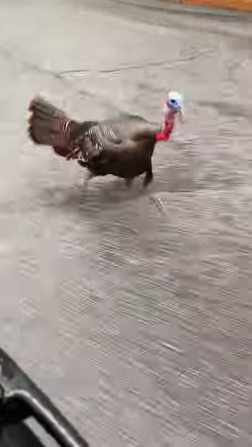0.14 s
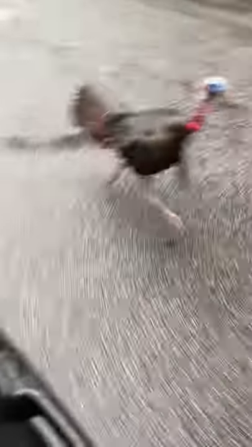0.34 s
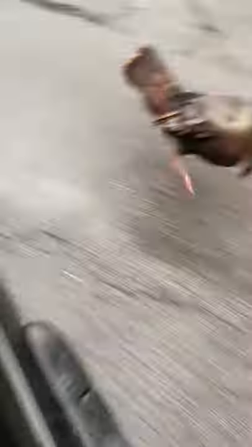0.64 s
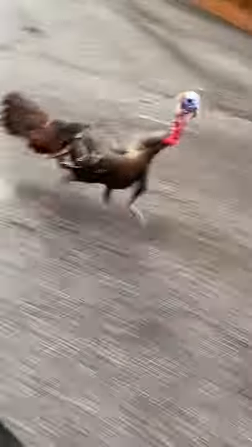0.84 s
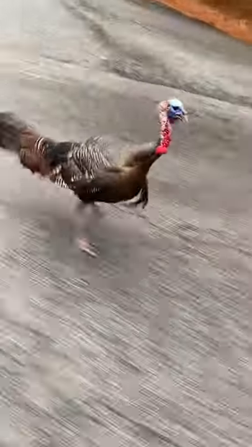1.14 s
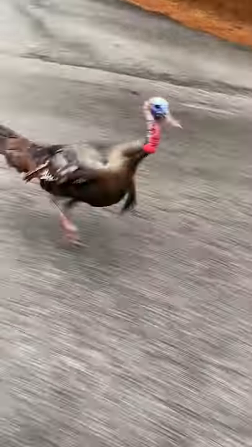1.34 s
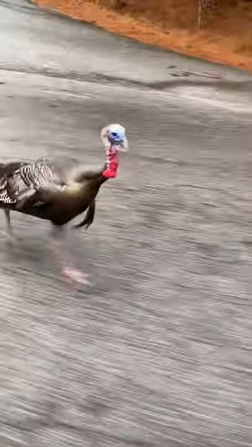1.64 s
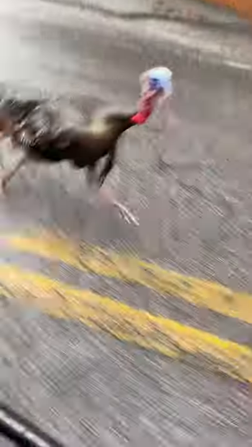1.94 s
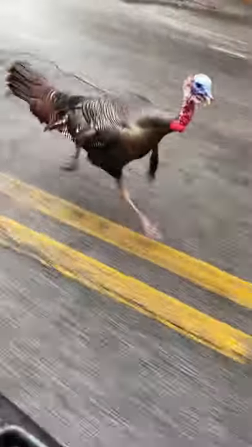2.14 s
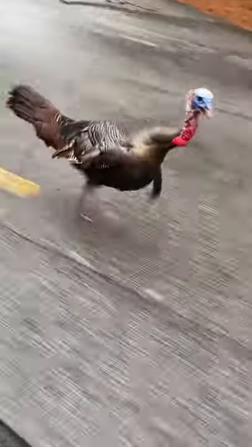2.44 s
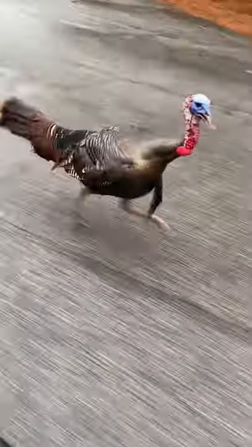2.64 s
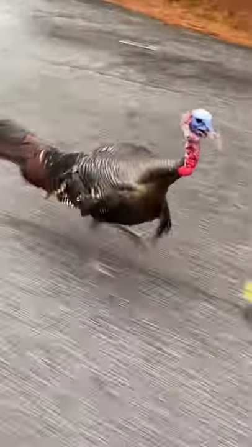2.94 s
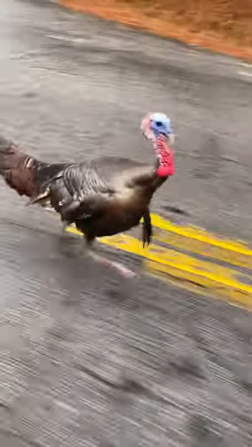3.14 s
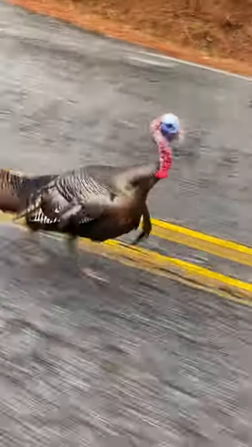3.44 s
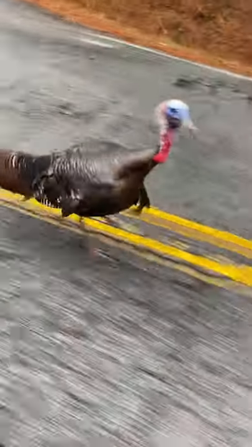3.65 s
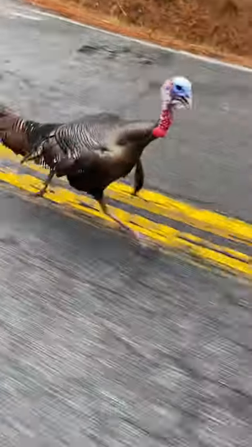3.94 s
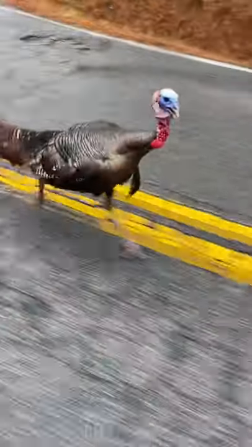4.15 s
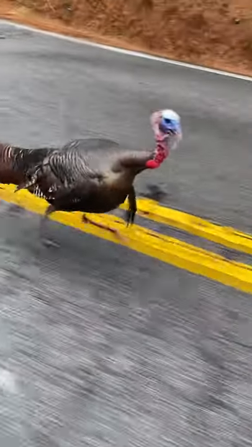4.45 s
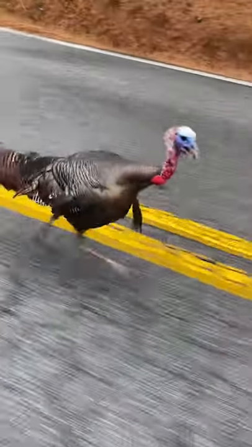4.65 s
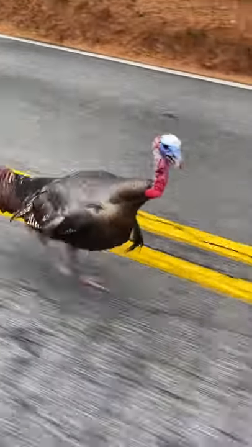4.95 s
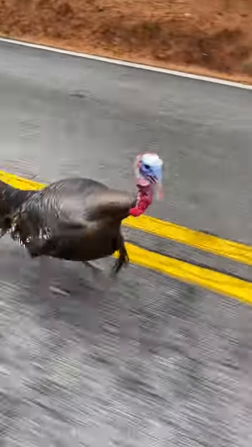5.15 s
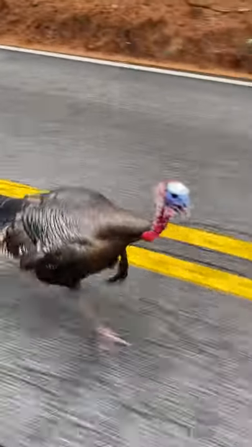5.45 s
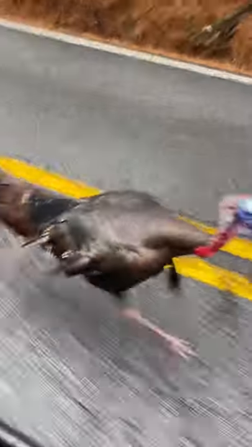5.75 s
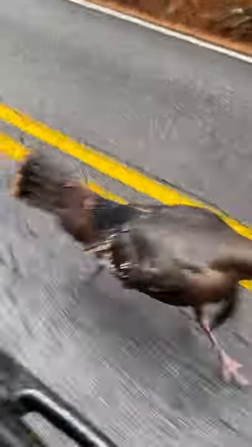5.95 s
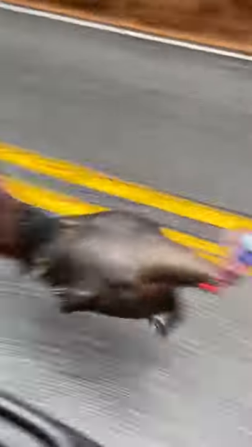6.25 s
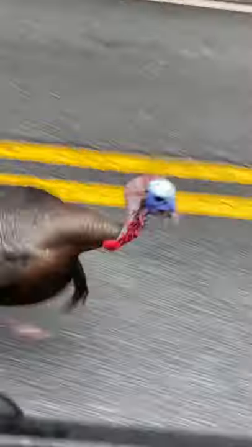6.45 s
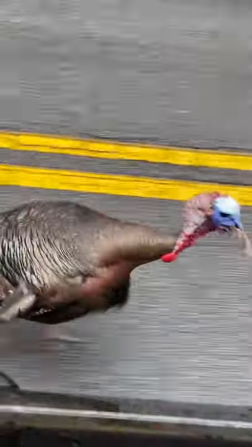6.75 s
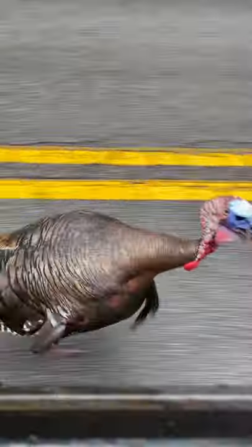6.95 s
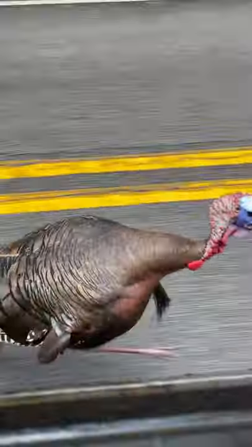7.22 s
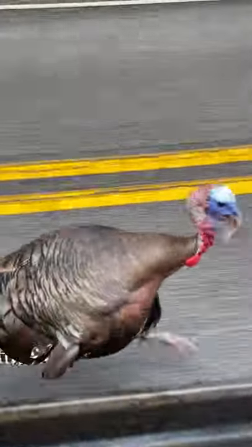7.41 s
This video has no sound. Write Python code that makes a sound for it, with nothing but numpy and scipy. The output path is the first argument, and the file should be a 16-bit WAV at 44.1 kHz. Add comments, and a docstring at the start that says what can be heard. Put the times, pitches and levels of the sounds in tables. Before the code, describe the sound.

Wind thumps and quick wet claw taps open, then a turkey's short reedy gobbles burst out close by, growing louder over steady car rumble.

```python
"""Wind pops, car rumble and quick wet footfalls come first; then a wild turkey whines, yelps and gobbles.
It runs close to the open window of a slowly rolling car; each gobble is a fast swoop of one reedy tone.
Pressed notes break an octave down through half-order partials; road and cabin throw the voice back.
Feet and drops are ticks of noise, the car is coloured noise, and each wind pop is a swing and a puff."""
import sys
import numpy as np
from scipy import signal
from scipy.fft import rfft, irfft, next_fast_len
from scipy.io import wavfile
from scipy.ndimage import map_coordinates

SR = 44100
rng = np.random.default_rng(int(sys.argv[2]) if len(sys.argv) > 2 else 0)


def master_out(mix):
    """Clip the mix to full scale and print it as 16-bit PCM to the path in sys.argv[1]."""
    frames = np.transpose(np.atleast_2d(mix))
    ceiling = np.clip(frames, -1, 1)
    pcm = np.round(ceiling * 32767).astype(np.int16)
    wavfile.write(sys.argv[1], SR, pcm)


N = 334278
TOP_HZ = 16500  # upper limit of the recorded band

# How road and wind rise and fall on the drive.
# Each row: time in seconds, relative level of the rumble in dB, relative level of the wind in dB.
DRIVE_LEVELS = [(0.0, -32, -39.5), (0.69, -32.5, -33), (1.12, -31, -34), (1.39, -32, -35), (1.58, -32, -38),
                (1.98, -34, -35), (2.2, -42, -45.5), (2.47, -44.5, -46.5), (3.04, -42.5, -44),
                (3.27, -31, -38), (3.46, -41, -45.5), (3.78, -45.5, -47.5), (4.22, -38.5, -44),
                (4.54, -40.5, -43), (5.07, -40.5, -43), (5.34, -42, -44), (6.71, -37, -44),
                (7.58, -39.5, -43)]
# Colour of a foot or a drop striking wet asphalt. Each row: frequency in Hz, gain in dB.
WET_STRIKE = [(600, -1.5), (1800, -3.5), (3000, -3), (5000, -4), (7500, 4.5), (10000, -3), (13500, -5),
              (16000, -14)]


def amp(db):
    """Decibels to gain."""
    return 10 ** (np.asarray(db) / 20)


def unit(x):
    """Scale to rms 1."""
    return x / np.sqrt(np.mean(x ** 2) + 1e-20)


def along(points, hz):
    """Read (Hz, value) points on a log frequency axis."""
    f, v = np.transpose(points)
    return np.interp(np.log(hz + 1), np.log(f), v)


def wobble(rate, size=N):
    """A smooth random curve with this many knots a second."""
    knot_count = int(size * rate / SR) + 4
    knots = np.random.default_rng(rng.integers(2 ** 32)).standard_normal(knot_count)
    return map_coordinates(knots, [np.arange(size) * rate / SR])


def filtered(x, response):
    """Multiply the spectrum of x by a response of frequency."""
    m = next_fast_len(x.shape[-1] + 4096)
    spectrum = rfft(x, m) * response(np.fft.rfftfreq(m, 1 / SR))
    return irfft(spectrum, m)[..., :x.shape[-1]]


def noise(spectrum):
    """Coloured noise of rms 1."""
    return unit(filtered(rng.standard_normal(N), lambda hz: amp(along(spectrum, hz))))


def add(track, s, sound):
    """Mix a sound in at time s, cut at the ends of the track."""
    start = round(s * SR)
    part = sound[max(-start, 0):max(N - start, 0)]
    track[max(start, 0):][:len(part)] += part


def placed(x, balance_db):
    """Two close microphone ports; the camera body shifts their phase and shades their midrange."""
    # Sound bending round the body. Each row: frequency in Hz, lead of the left port in radians.
    port_phase = [(60, -.03), (300, -.15), (700, -.55), (1500, -.15), (3000, .3), (5200, .35), (6300, 2.2),
                  (7000, 3.05), (7700, 3.25), (10500, 6.3), (11500, 7.15), (12500, 8.7), (14000, 9.6),
                  (16500, 12.3)]
    shading = [(250, 0.082), (600, 0.69), (1400, 0.4), (2800, 0.12)]  # (Hz, share of the balance)

    def port(side):
        def response(hz):
            level_db = side * balance_db * along(shading, hz) / 2
            return amp(level_db) * np.exp(.5j * side * along(port_phase, hz))
        return filtered(x, response)

    return np.array([port(side) for side in (1, -1)])  # left, right


def car(rumble_db=5.0, flutter_db=-1, wide_hiss_db=-7, wide_flutter_db=-7, wide_rumble_db=-21, bumps_db=2):
    """Road rumble, air fluttering round the window and wet tyre hiss; part of each differs between ports."""
    # Colours of road, window air and wet tyres. Each row: frequency in Hz, gain in dB.
    rumble_colour = [(15, -12), (28, -27), (45, 1), (78, -1), (110, -4), (170, -12), (300, -25.5),
                     (700, -133)]
    flutter_colour = [(60, -36), (130, -5), (230, -1.5), (400, -8.5), (700, -15), (1200, -37), (2500, -76),
                      (6000, -89)]
    tyre_colour = [(200, 4), (600, 22.5), (1100, 20), (2000, 13), (3200, 7), (4300, 1.5), (5800, 2.5),
                   (6400, 0), (7500, -1), (9300, -3.5), (11500, -7), (13500, -9), (15500, -12.5)]
    # Tyre hiss over the drive. Each row: time in seconds, level in dB.
    hiss_levels = [(0, -40.5), (1.2, -44.5), (2.6, -46), (7.5, -46.5)]
    t = np.arange(N) / SR
    s, *columns = np.transpose(DRIVE_LEVELS)
    road, wind = [amp(np.interp(t, s, c)) for c in columns]
    road = road * amp(bumps_db * wobble(9))
    hiss = amp(np.interp(t, *np.transpose(hiss_levels)) + 0.053 * wobble(11.0))
    flutter = amp(flutter_db) * wind * unit(noise(flutter_colour) * amp(4.3 * wobble(45)))
    shared = amp(rumble_db) * road * noise(rumble_colour) + flutter + hiss * noise(tyre_colour)

    def pair(spectrum):
        return np.array([noise(spectrum), noise(spectrum)])

    wide = amp(wide_hiss_db) * hiss * pair(tyre_colour)
    wide += amp(wide_flutter_db) * wind * pair(flutter_colour)
    wide += amp(wide_rumble_db) * road * pair(rumble_colour)
    return placed(shared, balance_db=-1.5) + wide


def buffets(steepness=3.1, rise=0.91, puff_db=-3, push_db=3.5, count=60):
    """An eddy hits the microphone as a pressure swing with a low puff; lesser ones come by chance."""
    # The strongest pops. Each row: time in seconds, relative level in dB, length in seconds, corner in Hz.
    strong_pops = [(.04, -13.5, 0.017, 706), (.168, -25, 0.022, 546), (.211, -22, 0.024, 504),
                   (.308, -12.5, 0.0065, 684), (.373, -20, 0.014, 477), (.475, -23.5, 0.014, 590),
                   (.517, -25.5, 0.013, 510), (.728, -17, 0.0042, 820), (.803, -23.5, 0.016, 560),
                   (.922, -18.5, 0.018, 750), (.963, -15, 0.0082, 510), (1.141, -15, 0.0019, 654),
                   (1.159, -19, 0.0053, 610), (1.176, -16.5, 0.0032, 630), (1.216, -14, 0.018, 91),
                   (1.263, -14, 0.0019, 875), (1.31, -18.5, 0.027, 560), (1.375, -21.5, 0.023, 378),
                   (1.468, -15.5, 0.013, 550), (1.555, -16, 0.013, 676), (1.614, -20, 0.0098, 490),
                   (1.815, -20, 0.01, 313), (1.952, -8.5, 0.016, 380), (1.973, -12.5, 0.011, 430),
                   (2.096, -25, 0.018, 342), (3.138, -5, 0.018, 90), (3.1426, -12.5, 0.005, 400),
                   (3.168, -17, 0.024, 298), (3.305, -17, 0.01, 268), (4.413, -18.5, 0.028, 144),
                   (6.955, -26.5, 0.028, 197)]
    # Lesser eddies: relative level in the strongest wind, dB gained per dB of wind, typical length and corner
    eddy_db, eddy_grows, eddy_s, eddy_hz = -20.5, 1.22, 0.011, 484
    out = np.zeros(N)
    t = np.arange(-SR // 12, SR // 12) / SR
    times, _, wind_db = np.transpose(DRIVE_LEVELS)
    eddies = []
    for k, (when, long, high) in enumerate(rng.random((count, 3))):
        s = (k + when) / count * N / SR
        db = eddy_db + eddy_grows * (np.interp(s, times, wind_db) - wind_db.max())
        eddies.append((s, db, eddy_s * (.5 + long), eddy_hz * (.5 + high)))
    for s, db, length, corner_hz in list(strong_pops) + eddies:
        shape = np.exp(-(t / (length * np.where(t < 0, rise, 1))) ** 2)

        def colour(hz):
            return hz ** 2 / (hz ** 2 + 65 ** 2) / (1 + (hz / corner_hz) ** steepness)

        puff = unit(filtered(shape * rng.standard_normal(len(t)), colour))
        puff = puff * np.sqrt(np.mean(shape ** 2))
        u = 2 * np.pi * corner_hz * t
        push = -np.tanh(3 * u) * np.exp(-np.abs(u) / 2.2)
        add(out, s + t[0], amp(db) * (amp(puff_db) * puff + amp(push_db) * push))
    # eddies carry little treble, and the microphone drops their deepest bass
    return filtered(out, lambda hz: hz ** 4 / (hz ** 4 + 30 ** 4) / (1 + (hz / 1700) ** 6))


def spray(count=14, drop_db=-43, spread_db=4, t60=0.037):
    """Drops thrown up from the road tick as decaying noise; the small ones come by chance."""
    # The larger drops. Each row: time in seconds, peak in dB before the wet colour.
    large_drops = [(0.31, -36.5), (0.501, -32.5), (0.578, -35), (0.6602, -33), (0.848, -33.5), (1.915, -35),
                   (2.416, -36), (2.55, -33), (3.1293, -35), (3.1712, -35), (3.3833, -36), (5.372, -30),
                   (6.3158, -33.5), (6.6997, -32)]
    out = np.zeros(N)
    t = np.arange(SR // 50) / SR
    small_drops = [(when * N / SR, drop_db + spread_db * (2 * size - 1))
                   for when, size in rng.random((count, 2))]
    for s, db in list(large_drops) + small_drops:
        add(out, s, amp(db - 60 * t / t60) * rng.standard_normal(len(t)))
    return filtered(out, lambda hz: amp(along(WET_STRIKE, hz)))


def feet(spread=0.019, tick_t60=0.013, splash_s=0.0079, tick_db=2, wet_db=-19, fade_db=200):
    """Toes and claws land one after another as ticks of noise and flick up water."""
    # Footfalls, five or six a second.
    # Each row: time in seconds, relative level in dB, level of the later toes against the first in dB.
    steps = [(0.0321, -33, -1), (0.2178, -28.5, -9), (0.405, -29.5, -1), (0.56, -45, 1), (0.751, -29.5, 1),
             (0.9316, -26.5, -28), (1.101, -28.5, -1), (1.2753, -30, -5), (1.4669, -25, -6),
             (1.628, -30.5, -6), (1.812, -29.5, -2.5), (1.9726, -30, -0.5), (2.175, -33.5, 4),
             (2.3536, -30, -2), (2.5104, -35.5, 0), (2.7276, -27, -13), (2.916, -27.5, -6),
             (3.072, -31.5, -5), (3.288, -26, -1), (3.422, -24, -3), (3.625, -31.5, 1), (3.7963, -29.5, -6),
             (4.015, -34.5, -5), (4.191, -30.5, -13), (4.3806, -31, -2), (4.568, -39, 2),
             (4.7698, -24.5, -14), (4.935, -22.5, -31), (5.11, -24.5, -10), (5.2775, -23.5, -10),
             (5.4728, -28, -9), (5.6422, -24, -10.5), (5.8398, -18, -15), (6.0058, -24, -29),
             (6.2088, -24.5, -1), (6.3789, -30, 4.5), (6.5676, -18.5, -23), (6.7291, -25, -0.5),
             (6.9161, -25.5, -1.5), (7.0907, -23, -7), (7.2799, -28.5, 0), (7.4572, -24, -2.5)]
    out = np.zeros(N)
    t = np.arange(-SR // 50, SR // 15) / SR
    order = np.arange(4)[:, None]
    later = order > 0
    for s, db, later_db in steps:
        scatter = rng.uniform(0, 0.806, order.shape) * later
        toes = 0.00056 + spread * (order + scatter) / len(order)  # landing times, s
        age = t - toes
        toe_db = later * (later_db + rng.normal(0, 3, order.shape)) - fade_db * toes  # fade in dB a second
        onset = np.clip(age / .0003, 0, 1)
        ticks = (onset * amp(toe_db - 60 * np.abs(age) / tick_t60)).sum(0)
        splash = np.exp(-((t - .011) / splash_s) ** 2)
        envelope = amp(db) * (amp(tick_db) * ticks + amp(wet_db) * splash)
        add(out, s + t[0], envelope * rng.standard_normal(len(t)))
    return filtered(out, lambda hz: amp(along(WET_STRIKE, hz)))


def throat(hz):
    """Gain of the throat and beak, with added peaks near 3.2 and 3.8 kHz."""
    # Throat and open beak. Each row: frequency in Hz, gain in dB.
    tract = [(350, -73), (540, -9.5), (720, 4.5), (950, 3.5), (1300, 6), (1800, 5.5), (2100, -2),
             (2500, -12.5), (2900, -22), (4400, -16.5), (5400, -3.5), (6800, -19), (11000, -13),
             (16000, -27)]
    # Broad peaks in the voice's colour. Each row: centre in Hz, width in Hz, added gain in dB.
    colour_peaks = [(1650, 120, 0), (3200, 420, 6), (3760, 540, 10)]
    peaks_db = sum(db / (1 + ((hz - centre) / (width / 2)) ** 2) for centre, width, db in colour_peaks)
    return amp(along(tract, hz) + peaks_db)


def syrinx(pitch, level_db, split, bright_db, jitter, shimmer, rasp_db, slope_db=-14, press_db=6,
           effort=0.43, flicker_db=4, undertone_db=-5, air_hz=3200):
    """One reedy tone; as it splits, half-order partials rise between its harmonics and it turns rough."""
    size = len(pitch)
    split = np.clip(split, 0, 1)
    rough = .2 + split
    hz = pitch * (1 + jitter * rough * wobble(459.0, size))
    phase = 2 * np.pi * np.cumsum(hz) / SR
    orders = np.arange(1, 25)[:, None] / 2
    # the slope is in dB an octave, and pressing flattens it
    gains = amp((slope_db + press_db * split) * np.log2(np.maximum(orders, 1)))
    gains = gains * np.where(orders % 1, 1.18 * split, 1)
    gains = gains * amp(undertone_db * (orders < 1)) * (orders * hz < TOP_HZ)
    # a harder push closes the membranes more sharply
    brightness = amp(bright_db + effort * (level_db + 26))
    gains = gains * np.where(orders * hz > 2500, brightness, 1)
    gains = gains * amp(flicker_db * np.array([wobble(119.3, size) for _ in orders]))
    partials = gains * np.sin(orders * phase + rng.uniform(0, 2 * np.pi, orders.shape))
    # even out the loudness that the throat would give the tone
    rms_after_throat = np.sqrt(((gains * throat(orders * hz)) ** 2).sum(0) / 2)
    tone = partials.sum(0) / rms_after_throat
    # air escapes once a cycle
    puffs = rng.standard_normal(size) * (1 + np.cos(phase))
    air = filtered(puffs, lambda f: 1 / (1 + (f / air_hz) ** 2))
    voice = tone * (1 + shimmer * rough * wobble(669.5, size) / 2) + amp(rasp_db) * rough * air
    ends = signal.windows.tukey(size, min(1, 0.0042 * SR / size))
    return filtered(voice * amp(level_db) * ends, throat)


def barks(waver=0.023, attack_s=0.0052, release_s=0.0084, edge_db=14.5, arch_db=1, swell_db=5.5):
    """A pressed note opens fast, curves in pitch, and breaks an octave down while it is loud."""
    # Yelps and hoarse barks. Each row: start in seconds, length in seconds, relative level in dB,
    # first, middle and last pitch in Hz, octave split 0-1, brightness in dB, hoarseness 0-1.
    calls = [(.848, 0.023, -35.5, 1290, 1100, 990, 0.22, -7, 0.49),
             (1.653, 0.054, -42, 1256, 1380, 1550, .6, -3, 0),
             (1.936, 0.071, -27.5, 1005, 958, 910, 0.34, 15, 0.35),
             (2.004, 0.08, -37.5, 1505, 1596, 1730, 1, 0, 0.43),
             (2.037, 0.024, -25, 1660, 1595, 1570, 1, -6, 0.25),
             (2.051, 0.037, -19.5, 1316, 1254, 1130, 0.51, -3.5, 0.39),
             (2.082, 0.017, -26, 1640, 1560, 1420, .02, 2, .1),
             (2.184, 0.039, -16.5, 1230, 1500, 1674, 0.58, 2.5, 0.64),
             (2.373, 0.068, -32.5, 1324, 1513, 1590, 0.51, -15, 0.42),
             (2.401, 0.027, -21, 1317, 1233, 1130, 0.71, -11, 0.74),
             (2.442, 0.019, -37.5, 1530, 1510, 1470, .1, 0, .1),
             (2.899, 0.049, -28.5, 1194, 1444, 1350, 1, 0, 0.016),
             (3.604, 0.041, -22.5, 1032, 837, 930, 0.051, 24, 0.35),
             (3.656, 0.031, -24, 800, 984, 1030, 0.12, 22, 0.5),
             (4.478, 0.028, -26, 1586, 1114, 754, 0.49, 0, 0.51),
             (4.498, 0.032, -16, 1187, 1140, 1280, 1, -5, 0.41),
             (4.52, 0.041, -15.5, 1290, 1338, 1130, 0.56, -5, 0.9),
             (4.552, 0.033, -25.5, 1150, 1120, 1010, .04, -3, 0.37),
             (5.195, 0.029, -23.5, 1475, 1140, 745, 0.25, 3, 0.54),
             (5.215, 0.027, -13, 1348, 1378, 1370, 0.74, -4.5, 0.8),
             (5.238, 0.027, -18, 1254, 1110, 895, 0.21, -11, 0.31),
             (5.253, 0.034, -15.5, 953, 937, 1050, 0.64, 6, 0.44),
             (5.28, 0.031, -20.5, 1130, 956, 930, 0.38, 10, 0.43),
             (5.936, 0.022, -26, 1210, 1080, 870, 0.6, 0, 0.13),
             (5.949, 0.026, -15, 1254, 1254, 1580, 0.71, -1.5, 0.69),
             (6.226, 0.017, -30, 1350, 1470, 1530, 0.46, 7, 0),
             (6.241, 0.042, -29, 956, 965, 780, .06, -9, 0.16),
             (6.275, 0.049, -16, 1390, 1324, 1140, 0.64, -10.5, 0.098),
             (6.308, 0.028, -18.5, 1158, 1508, 1530, 0.79, -7, 0.39),
             (6.446, 0.03, -13, 1133, 1190, 1270, 1, -5, 0.19),
             (6.535, .043, -30.5, 1240, 1013, 1000, .1, 4, 0.4),
             (6.574, 0.027, -31.5, 1430, 1474, 1370, 0.79, -9, 0.26),
             (6.614, 0.034, -23.5, 1110, 930, 920, 0.71, 2, 0.019),
             (6.638, 0.063, -25, 1293, 1367, 1730, 0.9, -10, 0.22),
             (6.678, 0.021, -22, 1366, 1238, 1340, 0.98, -10, 1)]
    # What hoarseness does. Each row: hoarseness 0-1, relative pitch jitter, relative shimmer,
    # flicker of the partials in dB, relative rasp in dB.
    hoarse_voice = [(0, .008, .2, 1.5, -22), (.3, .04, .7, 3.5, -10), (1, .09, .8, 4, -2)]
    hoarseness, *roughness = np.transpose(hoarse_voice)
    out = np.zeros(N)
    for s, length, db, first_hz, middle_hz, last_hz, split, bright_db, hoarse in calls:
        t = np.arange(int(length * SR)) / SR
        push = np.clip(np.minimum(t / attack_s, (length - t) / release_s), 0, 1)
        arch = 1 - (2 * t / length - 1) ** 2
        tremor = wobble(91.4, len(t))
        bend_hz = middle_hz - (first_hz + last_hz) / 2
        pitch = (np.linspace(first_hz, last_hz, len(t)) + arch * bend_hz) * (1 + waver * tremor)
        # a note that does not split swells more in its middle
        middle_db = arch_db + swell_db * (1 - split) ** 2
        level_db = db - edge_db * (1 - push) + middle_db * (arch - .5)
        jitter, shimmer, flicker_db, rasp_db = [np.interp(hoarse, hoarseness, c) for c in roughness]
        add(out, s, syrinx(pitch, level_db, split * (1 + push) / 2, bright_db, jitter, shimmer, rasp_db,
                           flicker_db=flicker_db))
    return out


def whines(split=0.042, waver=0.024):
    """A nearly pure tone swells, quavers and sags in pitch."""
    # Clear whines. Each row: start in seconds, length in seconds, pitch in Hz, relative level in dB,
    # brightness in dB.
    calls = [(0.939, 0.013, 1110, -22.5, -2), (1.609, 0.033, 1210, -29.5, -5), (1.731, 0.11, 1077, -25, -9),
             (1.871, 0.071, 1057, -24.5, -3), (2.287, 0.069, 1047, -23, 5), (6.045, 0.044, 1018, -34.5, 4),
             (6.091, 0.051, 1080, -23.5, -3), (6.128, 0.11, 981, -20, 11), (6.963, 0.042, 1017, -21.5, 9)]
    quaver_hz, quaver_db, quaver_bend = 42.3, 3.5, 0.049  # the throat pulses in level and pitch
    sag, arch_db = 0.086, 9.5  # share of pitch lost over a whine; how much its middle swells
    out = np.zeros(N)
    for s, length, hz, db, bright_db in calls:
        t = np.arange(int(length * SR)) / SR
        from_middle = t / length - .5
        quaver = -np.cos(2 * np.pi * quaver_hz * t)
        pitch = hz * (1 - sag * from_middle + quaver_bend * quaver + waver * wobble(88.5, len(t)))
        level_db = db - arch_db * (2 * from_middle) ** 2 + quaver_db * (quaver - 1)
        add(out, s, syrinx(pitch, level_db, split, bright_db, jitter=.04, shimmer=1.1, rasp_db=-11,
                           slope_db=-17))
    return out


def gobbles(waver=0.027, burst_db=-6.5):
    """Each note sinks in pitch as it leads in, bursts, jumps up a register and fades over its crest."""
    # Gobble notes. Each row: time of the burst in seconds, relative level in dB, dip pitch in Hz,
    # crest pitch in Hz, lead-in level in dB, tail level in dB, octave split 0-1, brightness in dB.
    notes = [(.996, -21, 1046, 1110, -41, -45, 0, -8), (1.03, -23, 1042, 1290, -32, -38, 0.6, -2.5),
             (1.072, -13, 1002, 1510, -42, -31, 0.43, -1), (1.108, -20, 1133, 1440, -53, -27, 0.2, 5),
             (1.149, -20, 1283, 1505, -52, -26.5, 0.5, -2), (1.185, -40, 1235, 1500, -50.5, -39, 0.3, -3),
             (2.981, -12.5, 917, 1026, -35, -31, 0.8, -5), (3.019, -20, 1286, 1264, -48, -28.5, 0.8, -6),
             (3.057, -9.5, 1166, 1480, -23.5, -25, 0.87, -2.5),
             (3.095, -24.5, 1360, 1460, -52, -42, 0.8, 0), (3.171, -33, 1184, 1640, -48, -33.5, 0.5, -3),
             (3.211, -14.5, 1173, 1320, -51, -29, 1, -2), (3.708, -10.5, 984, 1576, -23, -19.5, 0.24, 6),
             (3.745, -13, 1010, 1960, -31, -16, 0.34, 0), (3.786, -6, 968, 1745, -17.5, -23.5, 0.7, 9),
             (3.825, -11.5, 975, 1500, -31, -24.5, 0.54, 7),
             (3.863, -12, 1020, 1840, -41.5, -26.5, 0.4, 13), (3.902, -12.5, 1080, 1660, -42, -32, 0.32, 8),
             (3.939, -6.5, 898, 1570, -22, -22.5, 0.7, 6.5), (4.589, -12.5, 1135, 1206, -17, -24, 1, -3),
             (4.632, -10, 1073, 1670, -34, -20.5, 0.85, -8), (4.671, -11.5, 1034, 1660, -38, -29, 0.26, 3),
             (4.711, -5, 974, 1454, -19, -23.5, 0.42, 9), (4.75, -7, 970, 1400, -19.5, -30, 0.5, 11),
             (4.789, -14, 1067, 1630, -53, -42, 0.7, 1), (4.827, -11, 1050, 1780, -45, -30, 0.5, 1),
             (4.869, -17, 1304, 1470, -37, -23.5, 0.84, -1), (5.311, -4.5, 1028, 1350, -16, -20, 0.68, 4.5),
             (5.347, -9.5, 1007, 1640, -32, -22, 0.35, 1), (5.386, -6, 990, 1815, -21.5, -17.5, 0.54, 2),
             (5.425, -1.5, 1010, 1627, -17.5, -17.5, 0.43, 7), (5.465, -9, 977, 1527, -17.5, -21, 0.4, 10),
             (5.502, -6, 1252, 1505, -30, -23, 0.72, -1), (5.543, -7.5, 1206, 1560, -33, -23, 0.66, -9),
             (5.579, -25, 1166, 1067, -28.5, -32, 0.9, 11), (7.019, -5.5, 985, 1078, -26, -14, 0.18, 5.5),
             (7.061, -7, 950, 1144, -18.5, -21, 0.3, 7), (7.098, -1.5, 927, 1083, -15, -32, 0.24, 8),
             (7.133, -24, 1140, 1860, -51, -27, 0.33, -2), (7.172, -19.5, 1100, 1890, -54, -28, 0.1, 2),
             (7.211, -4, 1270, 1530, -49, -20, 0.84, -14), (7.25, -6.5, 1297, 1530, -28, -22.5, 0.95, -1),
             (7.288, -8.5, 1202, 1450, -31, -29, 0.43, 2)]
    out = np.zeros(N)
    t = np.arange(-.02 * SR, .026 * SR) / SR
    pitch_s = [-0.03, -.011, -0.008, 0, .003, .0062, 0.0121, 0.0244]
    level_s = [-0.015, -0.0065, -0.0058, -0.00019, 0.00073, 0.0045, 0.0079, 0.021]
    # only the hard-pressed heart of a note splits fully
    pressed = np.interp(t, [-0.012, -0.0025, 0.0051, 0.0116], [0.15, 0.89, 0.97, 0.35])
    for s, db, dip, crest, lead_db, tail_db, split, bright_db in notes:
        pitch = np.interp(t, pitch_s, [1.3 * dip, 1.02 * dip, .92 * dip, 1.051 * dip,
                                       1.206 * min(dip, crest), crest, crest, 0.797 * crest])
        pitch = pitch * (1 + waver * wobble(118.7, len(t)))
        peak_db = db + burst_db
        level_db = np.interp(t, level_s, [lead_db - 9.0, lead_db, max(lead_db, peak_db - 5.5), peak_db,
                                          peak_db, max(tail_db, peak_db - 8), tail_db, tail_db - 17.0])
        note = syrinx(pitch, level_db, split * pressed, bright_db, jitter=.048, shimmer=.75, rasp_db=-9)
        add(out, s + t[0], note)
    return out


def treble(voice):
    """The two upper bands of the voice each follow their own level."""
    # The treble changes from call to call.
    # Each row: time in seconds, level of 2.6-4.6 kHz in dB, level above 4.6 kHz in dB.
    band_levels = [(1.1, 1, 6), (2.0, 3, -11), (2.2, 9.5, -8.5), (3.05, 3, -2), (3.75, 1, -7),
                   (4.6, 2, 0.5), (5.25, -1, 1.5), (5.45, 2.5, 0), (6.2, 2, -10), (6.46, 1.5, -5),
                   (7.1, 0.5, -1.5), (7.25, 4, -7)]
    s, *columns = np.transpose(band_levels)
    lower, upper = [amp(np.interp(np.arange(N) / SR, s, c)) for c in columns]

    def above(edge):
        return filtered(voice, lambda hz: 1 - 1 / (1 + (hz / edge) ** 16))

    return voice + (lower - 1) * above(2600) + (upper - lower) * above(4600)


def road_bounce(voice, bounce_db=-6.5):
    """A delayed copy from the wet asphalt: it combs the spectrum and beats against each swoop."""
    # The path by way of the road, longer on the whole as the bird comes closer.
    # Each row: time in seconds, delay in milliseconds.
    path_delay = [(2.3, 2.69), (3.03, 2.995), (3.8, 2.82), (4.55, 2.855), (4.72, 2.96), (5.3, 3.045),
                  (6.3, 3.31), (6.46, 3.57), (6.66, 3.225), (7.06, 3.215), (7.2, 3.28)]
    n = np.arange(N)
    delay_s = np.interp(n / SR, *np.transpose(path_delay)) / 1000
    return amp(bounce_db) * map_coordinates(voice, [n - delay_s * SR])


def cabin(x, t60):
    """The car's interior answers briefly through the window, as decaying noise unlike at each port."""
    t = np.arange(SR // 6) / SR
    tail = rng.standard_normal((2, len(t))) * amp(-60 * t / t60) * (t > .002)
    return signal.fftconvolve(x[None], tail / np.linalg.norm(tail[0]), axes=1)[:, :N]


def scene():
    """The bird runs a little to the right, close to the window; feet, drops and wind sit near the centre."""
    background = car()
    centred = placed(feet() + spray() + buffets(), balance_db=-.2)
    voice = amp(-1.8) * treble(gobbles() + whines() + barks())
    echo = amp(-12.5) * cabin(voice, t60=.05)
    return placed(voice + road_bounce(voice), balance_db=-8.5) + echo + centred + background


def record(dry):
    """Nothing passes above the band limit."""
    return filtered(dry, lambda hz: hz < TOP_HZ)


dry = scene()
out = record(dry)
master_out(out)
```